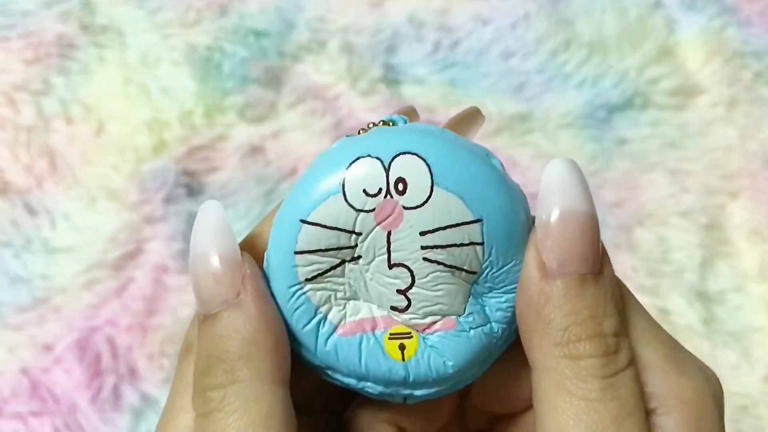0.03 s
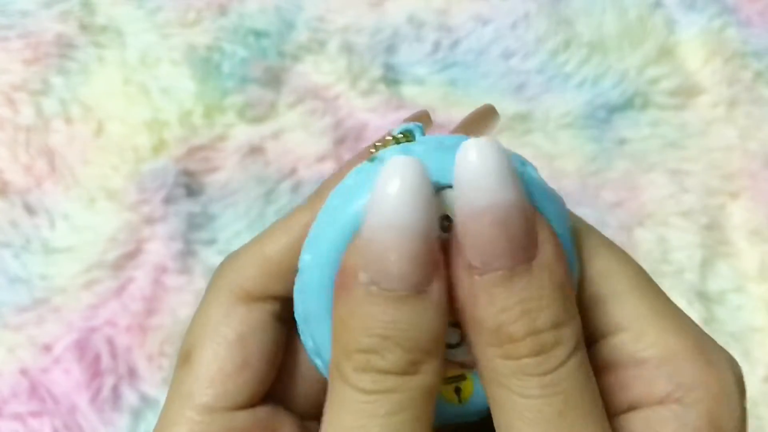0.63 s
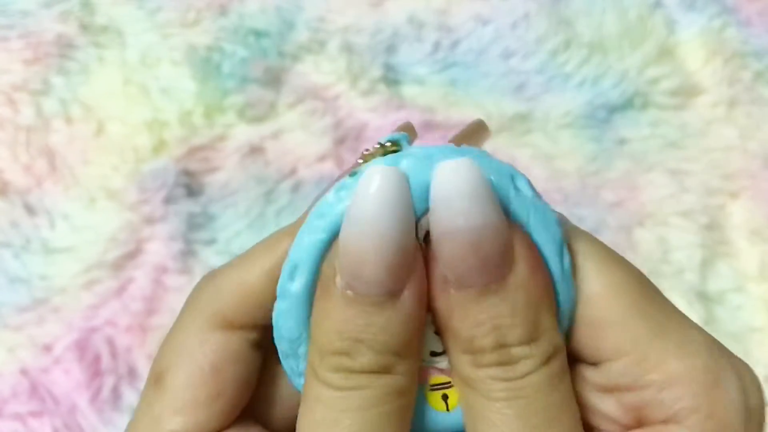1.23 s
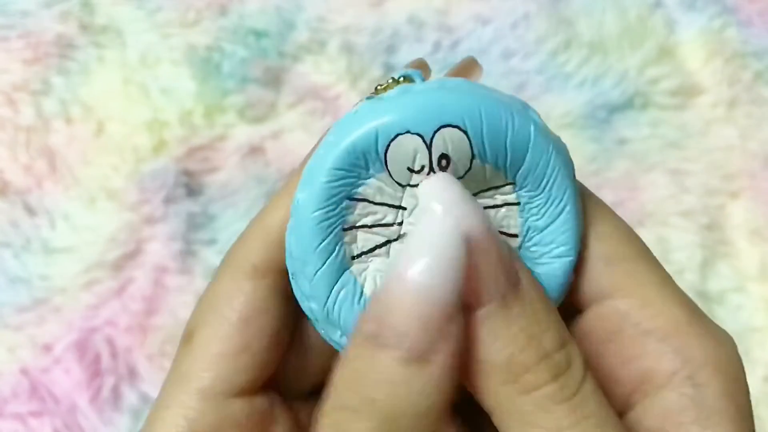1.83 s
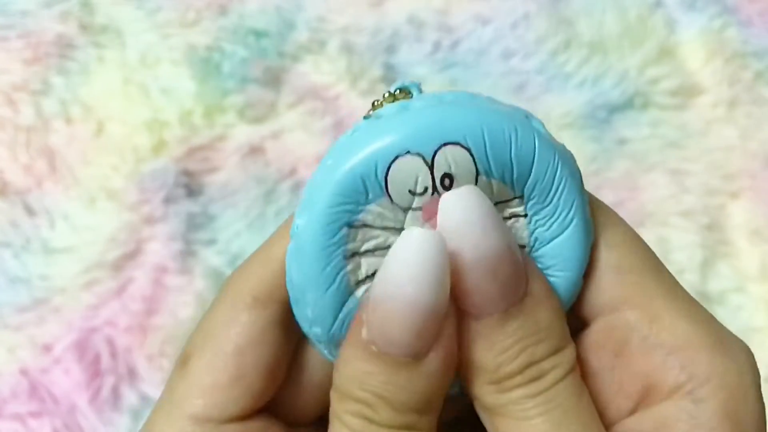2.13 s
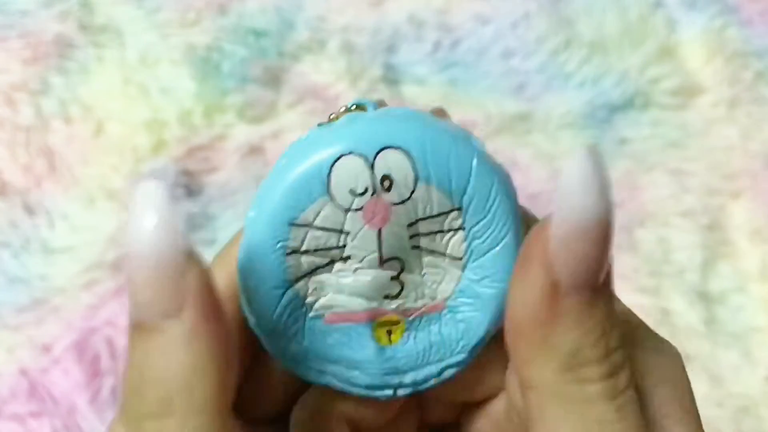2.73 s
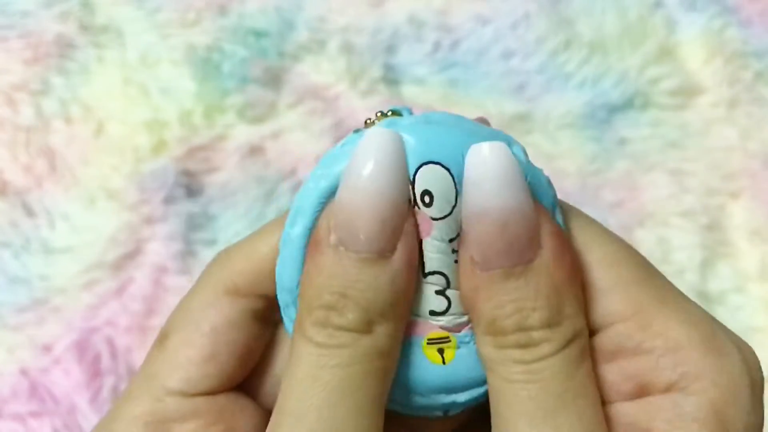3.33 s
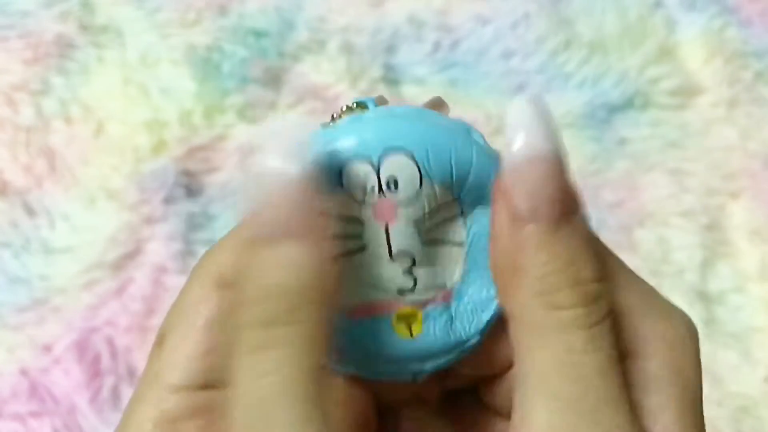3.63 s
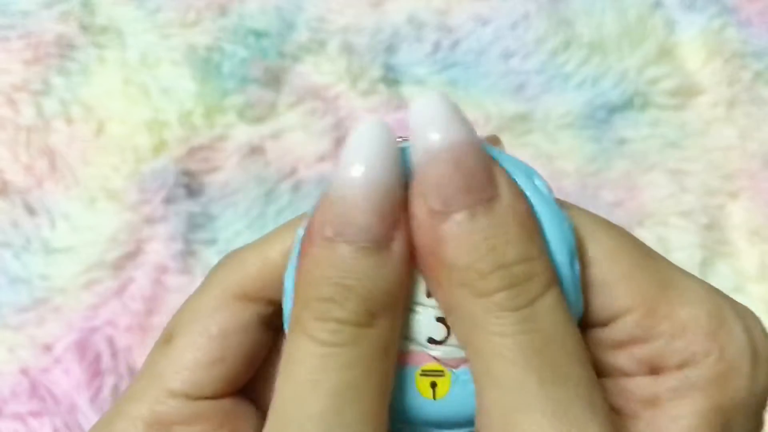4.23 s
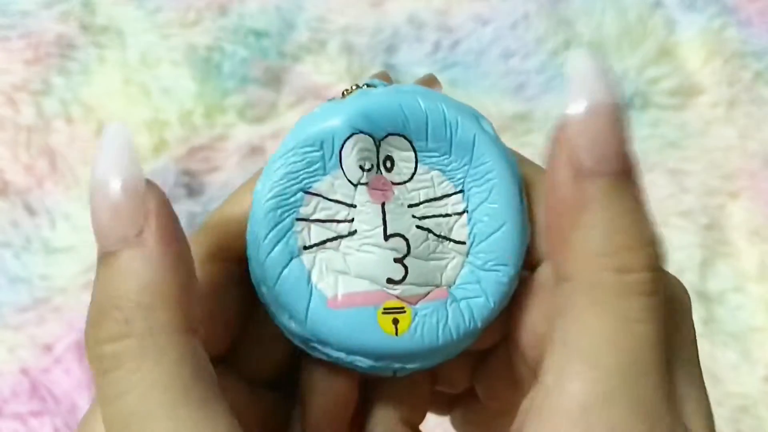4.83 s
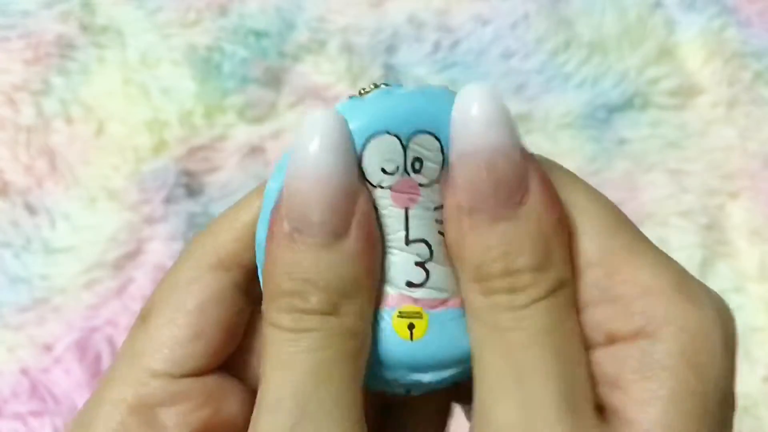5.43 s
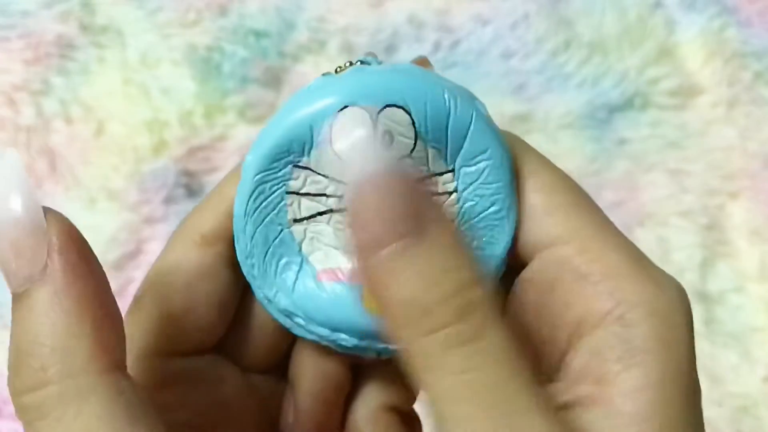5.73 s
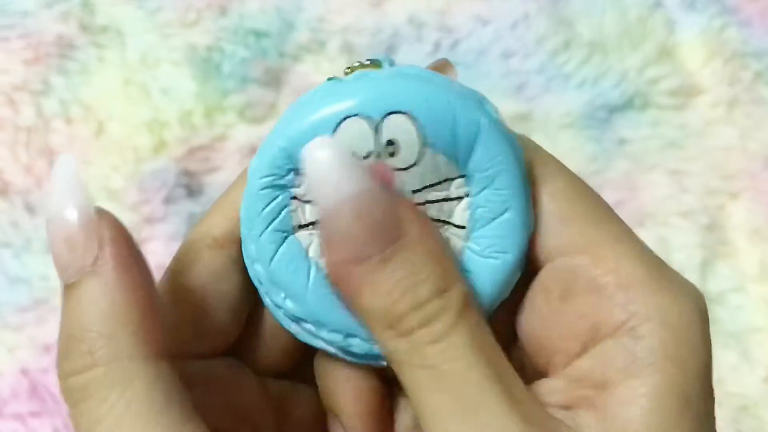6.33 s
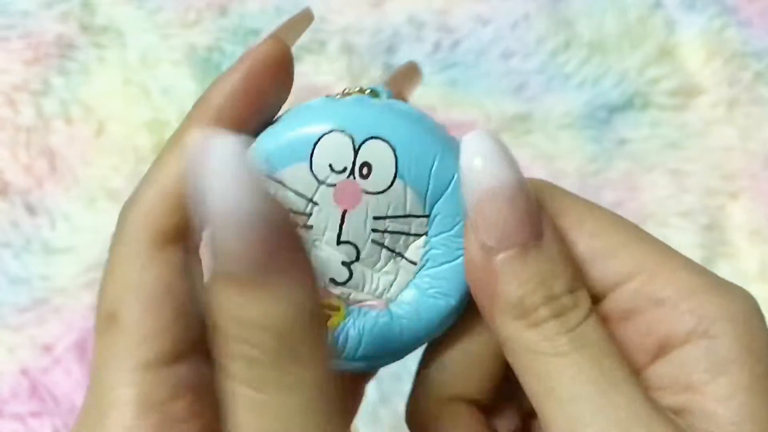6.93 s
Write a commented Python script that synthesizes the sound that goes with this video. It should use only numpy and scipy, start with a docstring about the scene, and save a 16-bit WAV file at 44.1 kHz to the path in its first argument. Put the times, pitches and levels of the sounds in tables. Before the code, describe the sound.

Low hand rumble, muffled rubbing and soft uneven thuds come from a foam toy being squeezed and released right by the microphone. After a few light fingernail ticks and one faint high squeak, skin repeatedly unsticks from the toy's surface in brief gritty hisses ending in small crackles. Later the grip relaxes, leaving the last peels over gentler handling and the low tone of a quiet room.

```python
"""A quiet room, a small microphone close to a soft foam toy, two thumbs kneading it.
From the start the hands rumble and skin sticks and slips on the foam in dull thuds and rubbing.
Long nails tick, as they will now and then, and the first press closes with a thin squeak. From 1 s on,
about once a second, a thumb peels off the tacky coating with a swelling hiss that ends in tiny snaps.
Near 5 s the grip slackens, and the last peels stand over softer handling and the room tone."""
import sys
import numpy as np
from scipy import signal
from scipy.fft import rfft, irfft
from scipy.io import wavfile
from scipy.ndimage import uniform_filter1d

SR = 44100
rng = np.random.default_rng(int(sys.argv[2]) if len(sys.argv) > 2 else 0)


def dump_mix(stems):
    """Bounce the given channels to the path in sys.argv[1] as a 16-bit WAV at rate SR."""
    frames = np.atleast_2d(stems).T  # one column per channel
    limited = np.clip(frames, -1, 1)  # hard clip at full scale
    pcm = np.round(limited * 32767).astype(np.int16)
    wavfile.write(sys.argv[1], SR, pcm)


N = 316638
TIME = np.arange(N) / SR

# the skin letting go with a distinct thud: t/s, peak level/dB, quickness/Hz
SKIN_THUDS = [(0.021, -22, 143), (0.0639, -23.5, 102), (0.1208, -17, 92), (0.1818, -33.5, 140),
              (0.5376, -25, 117), (0.6228, -14.5, 76.4), (0.684, -25.5, 158), (0.6967, -22.5, 94),
              (0.721, -30.5, 239), (0.744, -19, 102), (0.7892, -23, 76), (0.8143, -23, 119),
              (1.3027, -26, 78.5), (1.564, -28, 108), (1.9037, -22.5, 126), (2.1511, -18, 105),
              (2.2388, -28.5, 86), (3.238, -18.5, 167), (3.2545, -17, 166), (3.3058, -21, 195),
              (3.3725, -16.5, 156), (3.389, -17, 119), (3.9711, -16, 146), (4.437, -26, 108),
              (4.4981, -16.5, 90), (4.5575, -16.5, 130), (5.1967, -29.5, 85), (6.331, -33.5, 84),
              (6.3603, -32.5, 76), (6.752, -34.5, 62.7)]


def from_db(db):
    """Decibels to gain."""
    return 10 ** (np.asarray(db) / 20)


def rms_one(x):
    """Scale to unit power."""
    return x / np.sqrt(np.mean(x ** 2) + 1e-20)


def in_time(rows):
    """Each column of a curve at every sample."""
    s, *columns = np.transpose(rows)
    return [np.interp(TIME, s, c) for c in columns]


def band(x, low_hz, high_hz, order=2):
    """Causal band-pass."""
    sos = signal.butter(order, [low_hz, min(high_hz, .45 * SR)], "band", fs=SR, output="sos")
    return signal.sosfilt(sos, x + 1e-18)


def wobble(low_hz, high_hz):
    """Random wavering within a band of rates; rms 1."""
    return rms_one(band(rng.standard_normal(N), low_hz, high_hz))


def coloured(x, spectrum):
    """Give a steady excitation a spectrum; rms 1."""
    hz, db = np.transpose(spectrum)
    bins = np.maximum(np.fft.rfftfreq(N, 1 / SR), 1)
    gain = from_db(np.interp(np.log(bins), np.log(hz), db)) * np.minimum(bins / hz[0], 1) ** 2
    return rms_one(irfft(rfft(x) * gain, N))


def add(out, s, sound):
    """Mix a short sound in from time s on."""
    at = int(round(s * SR))
    first, last = max(at, 0), min(at + len(sound), N)
    if last > first:
        out[first:last] += sound[first - at:last - at]


def grains(per_s, spread_db):
    """Random clicks of uneven size and either sign."""
    sizes = from_db(spread_db * np.clip(rng.standard_normal(N), -2, 2)) * rng.choice([-1, 1], N)
    return sizes * (rng.random(N) < per_s / SR)


def room_tone(level_db):
    """The steady, mostly low noise of the quiet room."""
    # room spectrum: f/Hz, relative density/dB
    spectrum = [(22, -5.5), (60, 10), (140, -5), (280, -5.5), (550, -12), (1000, -15.5), (1600, -16),
                (2600, -21.5), (3400, -27.5), (4900, -34.5), (6200, -36.5), (9000, -40), (15800, -43)]
    return from_db(level_db) * coloured(rng.standard_normal(N), spectrum)


def friction(force_db, firm_db=-30, growth=1.264):
    """Friction in dB: it equals the force at a firm stroke and grows faster than the force."""
    return firm_db + growth * (force_db - firm_db)


def kneading(attack_s, release_s, hold_drag_db, stick_db, stick_lead_s, stick_s, surge_db):
    """Force and friction in dB: each stroke builds, holds and lets go above the steady hold."""
    # the hands' hold on the toy between strokes: t/s, force/dB
    hold = [(0, -45.5), (0.92, -39), (1.0, -56), (1.2, -41.5), (1.8, -42), (2.35, -40), (2.6, -46.5),
            (2.8, -48), (2.92, -41), (3.55, -43.5), (3.85, -40.5), (4.85, -44.5), (4.95, -61.5), (5.8, -54),
            (6.4, -50.5), (7.0, -65)]
    # thumb strokes into the foam: start/s, length/s, force/dB, skin drag/dB
    strokes = [(0.0, 0.088, -32.5, 7.5), (0.13, 0.2, -34, -2), (0.346, 0.049, -27.5, -5.5),
               (0.527, 0.1, -30.5, 2.5), (0.669, 0.071, -32.5, 6.5), (0.78, 0.048, -32.5, 2.5),
               (1.118, 0.025, -35.5, -8), (1.274, 0.043, -34.5, -2.5), (1.355, 0.1, -37.5, 2.5),
               (1.54, 0.14, -34, -10.5), (1.843, .15, -33.5, -0.5), (2.129, 0.044, -24, -3.5),
               (2.39, 0.07, -32, -6), (2.87, 0.05, -41, -1), (2.973, 0.077, -34, -3),
               (3.093, 0.023, -35, -3), (3.163, 0.071, -30.5, 1), (3.236, .045, -23, 0),
               (3.3, 0.093, -28.5, 4), (3.719, 0.031, -36, 5), (3.946, 0.038, -24.5, -5),
               (4.066, 0.041, -32, 0), (4.223, 0.06, -33, -1.5), (4.323, .11, -34, 2.5),
               (4.467, 0.036, -25, -4.5), (4.579, 0.015, -28.5, -5), (5.169, 0.033, -36.5, -13),
               (5.7, 0.032, -41, -5), (6.325, 0.059, -41.5, -6), (7.076, 0.083, -44.5, -5)]
    force_db, = in_time(hold)
    friction_db = friction(force_db) + hold_drag_db  # a holding thumb hardly slides
    for start, length, db, drag_db in strokes:
        outside = np.maximum((start - TIME) / attack_s, (TIME - start - length) / release_s)
        stroke_db = db - 20 / np.log(10) * np.maximum(outside, 0)
        force_db = np.maximum(force_db, stroke_db)
        friction_db = np.maximum(friction_db, friction(stroke_db) + drag_db)
    for s, _, _ in SKIN_THUDS:  # just before a thud the skin sticks and the rubbing stalls
        friction_db += stick_db * np.exp(-np.minimum(((TIME - s + stick_lead_s) / stick_s) ** 2, 20))
    return force_db, friction_db + surge_db * wobble(14.4, 46.4)  # skin grips and gives unevenly


def hand_rumble(force_db, evenness):
    """The hands shifting close to the microphone make a deep, fairly even rumble."""
    # rumble spectrum: f/Hz, relative density/dB
    spectrum = [(22, -30), (35, -3.5), (50, 13), (70, 9.5), (100, 6.5), (150, 1.5), (250, -68),
                (1000, -99.5)]
    rumble = coloured(rng.standard_normal(N), spectrum)
    swell = np.sqrt(uniform_filter1d(rumble ** 2, size=1800) + 1e-6)
    return from_db(force_db) * rms_one(rumble / swell ** evenness)


def lesser_slips(friction_db, per_s=45, above_db=2.5, spread_db=2.5, centre_hz=80, spread_octaves=.32):
    """Skin slips at uneven intervals, as hard as it is dragged: t/s, peak level/dB, quickness/Hz."""
    gap, size, quickness = rng.uniform(-1, 1, (600, 3)).T
    s = np.cumsum(1 + .7 * gap) / per_s
    db = np.interp(s, TIME, friction_db) + above_db + spread_db * size
    hz = centre_hz * 2 ** (spread_octaves * quickness)
    return np.column_stack([s, db, hz])[s < TIME[-1]]


def skin_slips(friction_db, low_hz, high_hz):
    """Each slip is one rounded swing of force; the quicker it is, the higher it reaches."""
    out, half_s = np.zeros(N), .03
    t = np.arange(-half_s, half_s, 1 / SR)
    for s, db, hz in [*SKIN_THUDS, *lesser_slips(friction_db)]:
        u = 2 * np.pi * hz * t
        add(out, s - half_s, from_db(db) * np.pi * u / (1 + u * u) ** 2)
    return band(out, low_hz, high_hz, order=1)


def rubbing(friction_db, per_s, soft_hz, firm_hz, soft_db, firm_db, firm_growth):
    """Countless small slips, muffled by the foam; firm rubbing adds quicker, brighter ones."""
    soft = rms_one(band(grains(per_s, spread_db=-0.5), 118, soft_hz))
    soft = band(soft, 56, 450)
    firm = band(grains(per_s, spread_db=12.5), 182, firm_hz)
    firm = rms_one(band(firm, 100, 770))
    firmness_db = firm_growth * np.minimum(friction_db + 10.5, 0)
    # below -55 dB of friction a finger sticks and stops rubbing
    sliding = np.sqrt(np.maximum(from_db(2 * friction_db) - from_db(2 * -55), 0))
    return sliding * (from_db(soft_db) * soft + from_db(firm_db + firmness_db) * firm)


def nail_ticks(level_db, scrape_s, scrape):
    """A nail strikes and skids for a moment; a softer touch leaves its high modes quiet."""
    # long nails touching: t/s, relative level/dB, hardness/Hz
    taps = [(0.2950, -35.5, 4800), (0.3113, -32.5, 13000), (0.3835, -55, 6500), (3.548, -49, 5500),
            (3.557, -50, 6500), (4.345, -45, 4000), (6.246, -48.5, 8000), (6.2664, -47, 11000)]
    # a nail's modes: f/Hz, relative level/dB, t60/s
    modes = [(1460, -22, 0.0033), (3290, -2, 0.0034), (4540, -6.5, 0.0052), (4870, 6.5, 0.00077),
             (7140, -4, 0.0023), (8200, -16, 0.002), (12500, -7, .002), (15400, -4, .002)]
    out, t = np.zeros(N), np.arange(1024) / SR
    for s, db, hardness_hz in taps:
        force = (t == 0) + scrape * rng.standard_normal(len(t)) * np.exp(-t / scrape_s)
        ring = np.zeros(len(t))
        for hz, mode_db, t60 in modes:
            decay = from_db(mode_db - 60 * t / t60)
            ring += decay * np.sin(2 * np.pi * hz * t) / (1 + (hz / hardness_hz) ** 4)
        add(out, s, from_db(db + level_db) * signal.fftconvolve(force, ring))
    return out


def peeling(per_s, spread_db, rasp_hz, fall_ratio, rim_db, rim_stretch, let_go_s):
    """Microscopic bonds break as the contact shrinks: a gritty hiss, and a rasp from coarser ones."""
    # coating peeling from the skin: crest/s, letting go/s, hiss/dB, rasp/dB, swell time/s
    peels = [(0.385, .42, -74, -70, .022), (0.488, .58, -74, -73, .055), (0.968, 1.0, -68, -72, 0.014),
             (1.055, 1.11, -52.5, -55.5, 0.019), (2.167, 2.2, -62.5, -67, .032),
             (2.264, 2.299, -51.5, -59, 0.012), (3.26, 3.316, -57, -65, 0.037),
             (3.486, 3.56, -72, -67, .025), (4.261, 4.393, -50, -54, 0.015),
             (5.178, 5.224, -54, -59, 0.019), (6.048, 6.082, -51.5, -61, 0.016),
             (6.39, 6.5, -73, -82, 0.096), (6.697, 6.72, -72, -70, .022)]
    # hiss spectrum: f/Hz, relative density/dB
    spectrum = [(1200, -0.5), (2500, -1.5), (4000, -4.5), (6000, -37), (8500, -4), (10500, -5),
                (13500, -2.5), (16000, -3.5)]
    hiss_power, rasp_power = np.zeros((2, N))
    for crest_s, free_s, hiss_db, rasp_db, swell_s in peels:
        from_crest = np.minimum(np.maximum(crest_s - TIME, (TIME - crest_s) / fall_ratio) / swell_s, 20)
        # the rim of the contact peels faintly and for longer
        rim = from_db(2 * rim_db) * np.exp(-2 * from_crest / rim_stretch)
        touching = np.clip(1 - (TIME - free_s) / let_go_s, 0, 1)
        swell = (np.exp(-2 * from_crest) + rim) * touching
        hiss_power += from_db(2 * hiss_db) * swell
        rasp_power += from_db(2 * rasp_db) * swell
    hiss = coloured(grains(per_s, spread_db), spectrum)
    rasp = rms_one(band(grains(per_s / 4, spread_db), *rasp_hz))
    return np.sqrt(hiss_power) * hiss + np.sqrt(rasp_power) * rasp


def squeak(waver, flutter_db):
    """A faint, unsteady whistle glides up and down, breaking as the contact catches."""
    # the thin squeak as the first press closes: t/s, f/Hz, level/dB
    glide = [(0.445, 11750, -80), (0.478, 12050, -81), (0.510, 13850, -68), (0.515, 14700, -88),
             (0.524, 15350, -69), (0.548, 14800, -98), (0.562, 14000, -64), (0.578, 12900, -92)]
    hz, db = in_time(glide)
    hz *= 1 + waver * wobble(30, 600)
    db += flutter_db * wobble(30, 200)
    sounding = (TIME > glide[0][0]) & (TIME < glide[-1][0])
    return sounding * from_db(db) * np.sin(2 * np.pi * np.cumsum(hz) / SR)


def coating_snaps(body_low_hz, split_hz, body_db, edge_db, decay_s, last_rupture):
    """Small ruptures run together into one sharp crack; then the skin is free and the sound stops."""
    # last patches of coating snapping free: t/s, relative body/dB, relative edge/dB, build-up/s
    patches = [(1.0803, -40, -46, 0.00045), (1.1047, -42.5, -45.5, 0.00026), (2.266, -39, -42, 0.0014),
               (2.2895, -58, -46, .0015), (2.299, -42.5, -43, 0.0032), (3.3147, -40.5, -41, 0.00028),
               (3.3103, -45, -47, .002), (4.2660, -42, -46, .0008), (4.2728, -34, -46, .001),
               (4.278, -33, -47, 0.00075), (4.2993, -44.5, -54, 0.00081), (5.207, -45, -45, .0003),
               (5.2255, -39, -40, 0.0017), (6.05, -41.5, -40, 0.001), (6.057, -48, -38, .00085),
               (6.7171, -56, -47.5, 0.00023)]
    out, t = np.zeros(N), np.arange(-512, 512) / SR
    per_millisecond = np.sqrt(SR / 1000 / len(t))  # levels count the energy as if packed into 1 ms
    for s, low_db, high_db, build_up_s in patches:
        swell = np.exp(-np.maximum(-t / build_up_s, t / decay_s))
        low, high = rng.standard_normal((2, len(t))) * swell + last_rupture * (t == 0)
        body = from_db(low_db + body_db) * rms_one(band(low, body_low_hz, split_hz))
        edge = from_db(high_db + edge_db) * rms_one(band(high, split_hz, 17700))
        add(out, s + t[0], (body + edge) * per_millisecond)
    return out


def scene():
    """Dull handling and crisp surface sounds at close range, room tone behind them; mono."""
    force_db, friction_db = kneading(attack_s=.011, release_s=.016, hold_drag_db=-3.5,
                                     stick_db=-4.5, stick_lead_s=.015, stick_s=.0056, surge_db=2)
    dull = hand_rumble(force_db, evenness=.79)
    dull += skin_slips(friction_db, low_hz=33.8, high_hz=1690)
    dull += rubbing(friction_db, per_s=500, soft_hz=231, firm_hz=472,
                    soft_db=-4.5, firm_db=-7.5, firm_growth=.69)
    crisp = peeling(per_s=8900, spread_db=3.5, rasp_hz=(4800, 8000), fall_ratio=1.08,
                    rim_db=-14.5, rim_stretch=4.8, let_go_s=.003)
    crisp += squeak(waver=.008, flutter_db=2.5)
    crisp += coating_snaps(body_low_hz=1220, split_hz=6600, body_db=-3, edge_db=-2,
                           decay_s=.001, last_rupture=1.5)
    crisp += nail_ticks(level_db=-3, scrape_s=.0021, scrape=.19)
    return (dull + crisp + room_tone(level_db=-49))[None]


def record(dry):
    """The small microphone adds a few bumps and dips; the top is cut at 15.75 kHz."""
    # the microphone's colour: f/Hz, width/Hz, gain/dB
    response = [(394, 57, 3.5), (646, 135, 2), (987, 222, 6), (7650, 620, -3.5), (10400, 850, -5.5)]
    for hz, width_hz, db in response:
        resonance = signal.lfilter(*signal.iirpeak(hz, hz / width_hz, fs=SR), dry)
        dry = dry + (from_db(db) - 1) * resonance
    return signal.sosfilt(signal.ellip(12, .1, 70, 15750, fs=SR, output="sos"), dry)


dry = scene()
out = record(dry)
dump_mix(out)
```